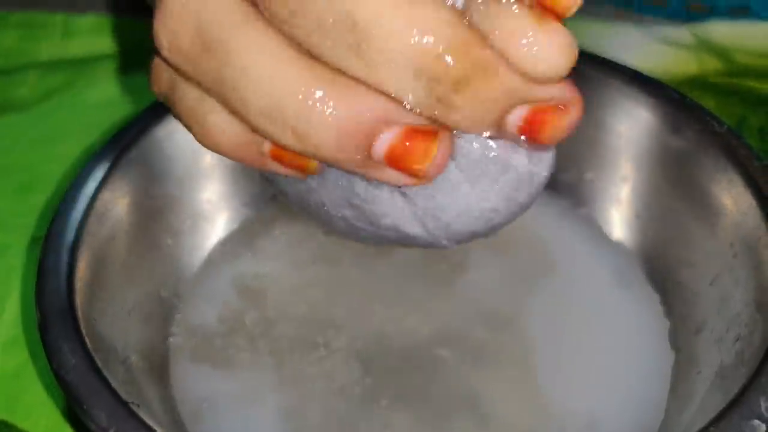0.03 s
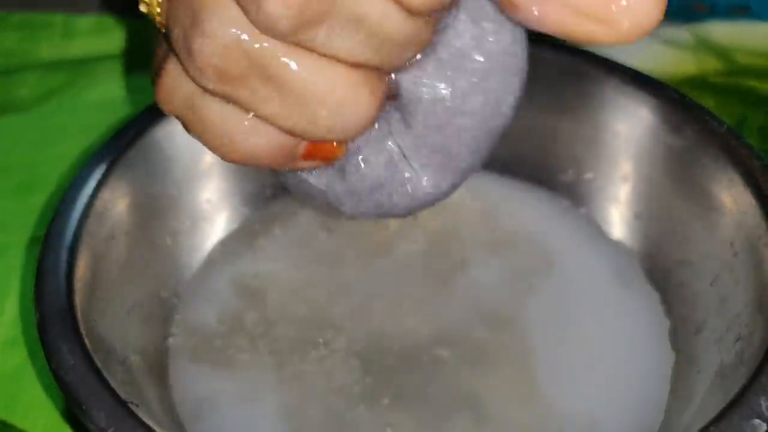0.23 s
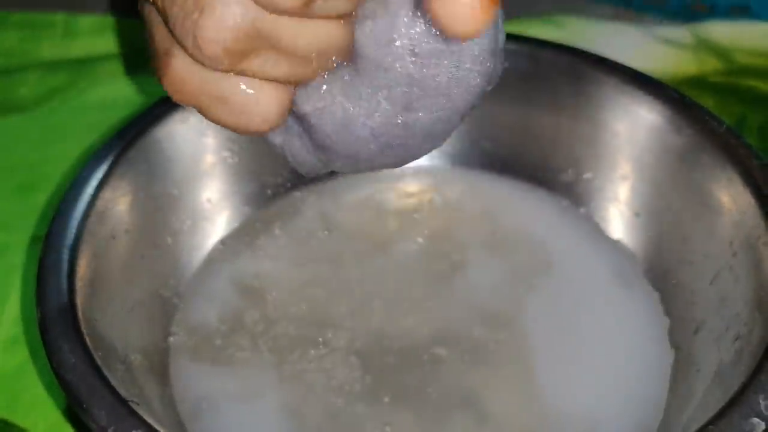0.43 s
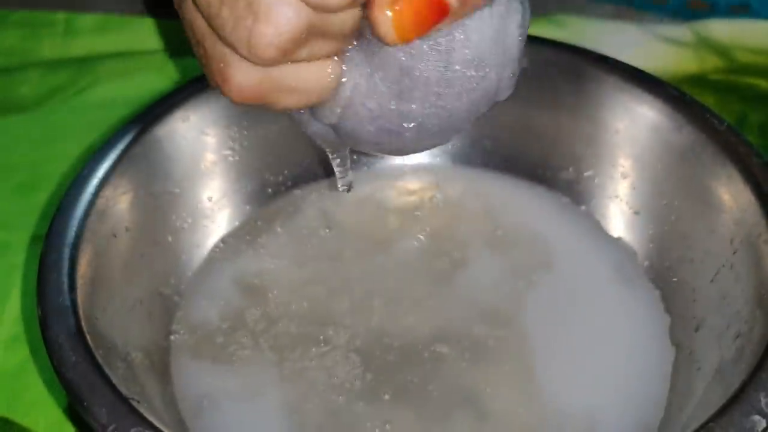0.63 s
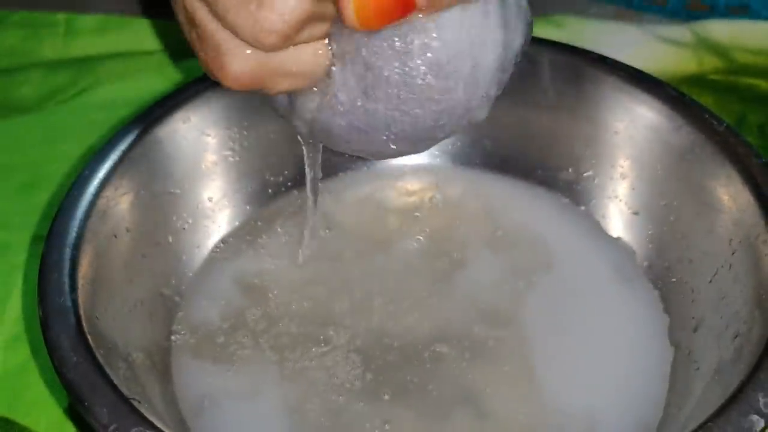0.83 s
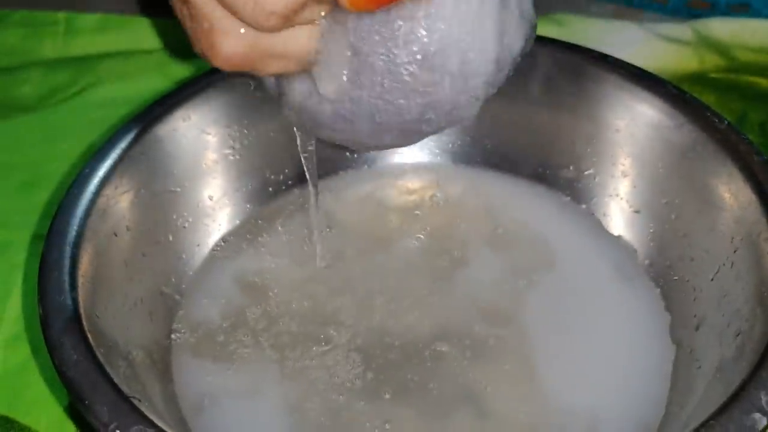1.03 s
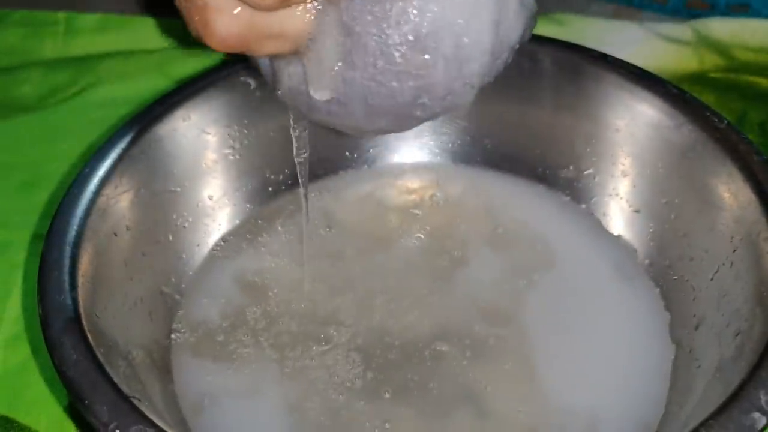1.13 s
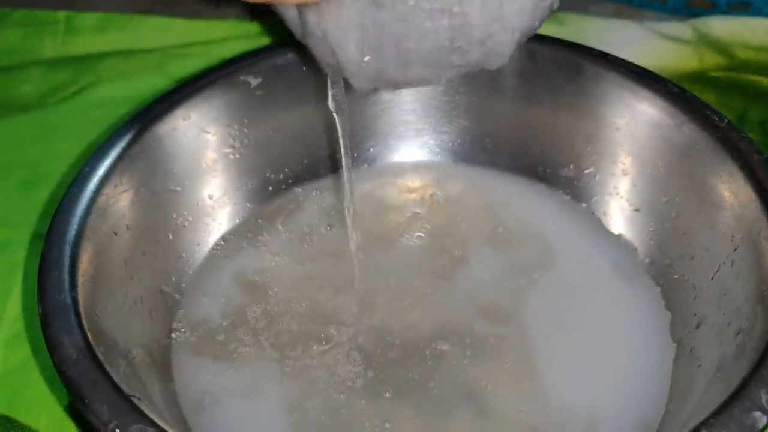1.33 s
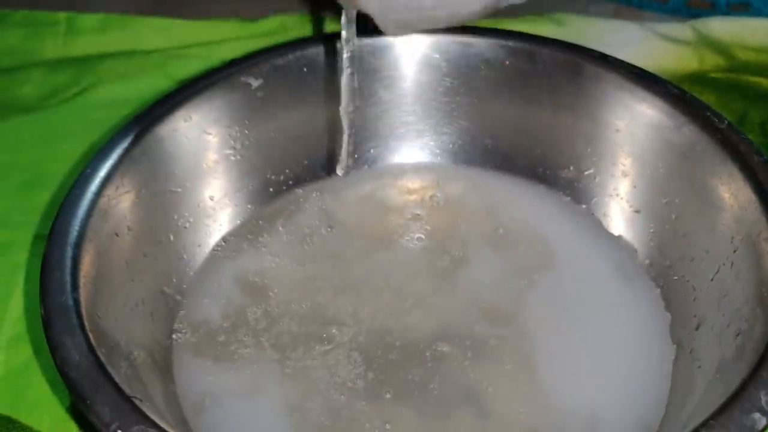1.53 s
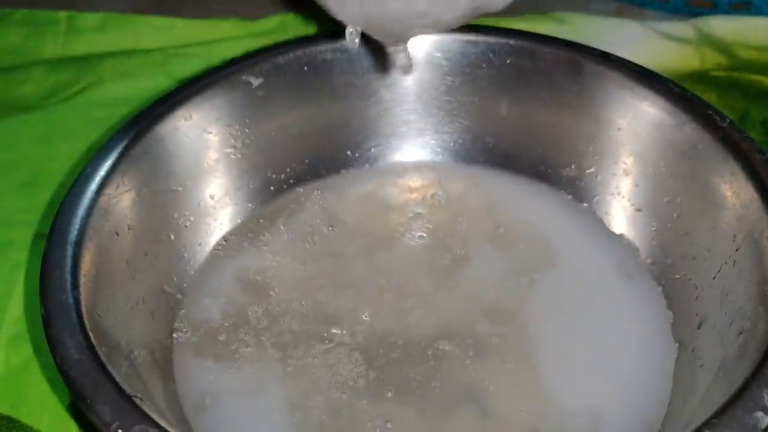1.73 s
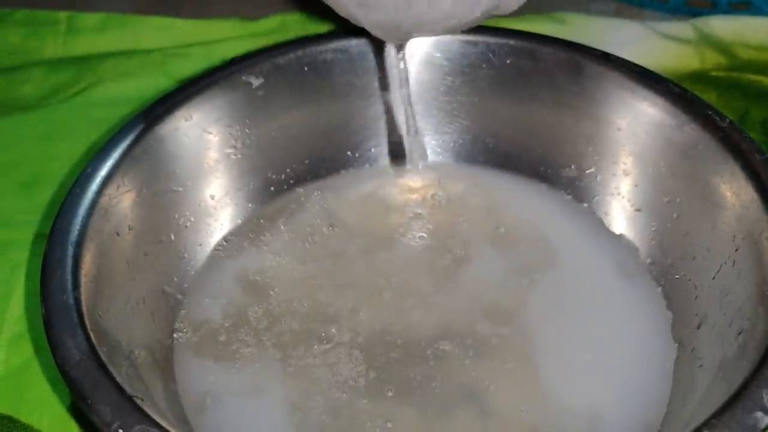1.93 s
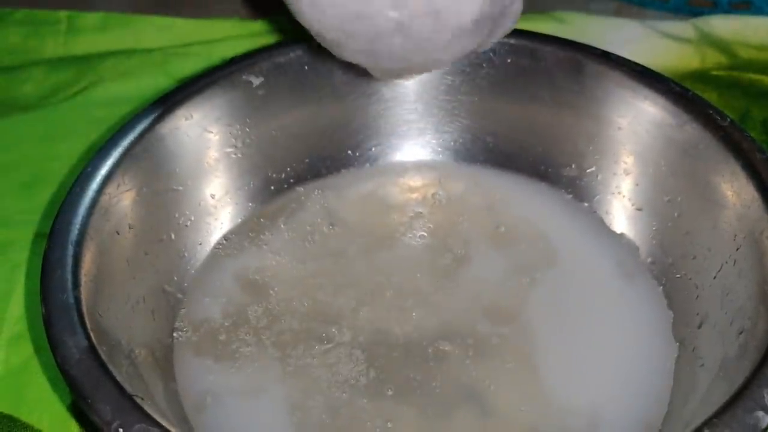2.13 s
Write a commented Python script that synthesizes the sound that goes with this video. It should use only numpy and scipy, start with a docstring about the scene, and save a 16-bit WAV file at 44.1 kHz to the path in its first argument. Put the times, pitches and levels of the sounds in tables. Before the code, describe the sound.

Wet cloth bundle squeezed by hand, crackling and fizzing with tiny bubble pops over a fan drone

```python
"""A room where a fan drones: a wet cloth bundle is wrung by hand over a steel bowl.
Fan and room hiss are shaped noise, the fan with a sine blade tone; dense tiny pops make the seeping fizz.
Trapped air crackles out of the weave in short bright bursts of clicks, with dying bubble tones, sharp
droplet snaps, soft low squelches and one thin whistle of leaking air.
Two microphone ports, each with its own treble resonance, colour crackle bodies, droplets and fizz."""
import sys
import numpy as np
from scipy import signal
from scipy.fft import rfft, irfft
from scipy.io import wavfile

SR = 44100
rng = np.random.default_rng(int(sys.argv[2]) if len(sys.argv) > 2 else 0)


def materialize(psi):
    """Save the field psi as 16-bit PCM at rate SR to the path in sys.argv[1].

    A 1-D psi becomes a single channel; in a 2-D psi each row is a channel.
    """
    bounded = np.clip(np.atleast_2d(psi).T, -1, 1)
    quanta = np.round(bounded * 32767).astype(np.int16)
    wavfile.write(sys.argv[1], SR, quanta)


N = 96093

# Every lean is left minus right.
# Broad fan drone. Each row: frequency in Hz, relative density in dB per Hz.
FAN_SPECTRUM = [(20, -20), (43, -23.5), (87, -13.5), (107, -11.5), (150, -5.5), (170, 1), (186, -4),
                (200, -8), (222, -13.5), (260, -7.5), (329, -20), (536, -22.5), (728, -33), (1010, -34),
                (1500, -47)]
# Room hiss. Each row: frequency in Hz, relative density in dB per Hz.
AIR_SPECTRUM = [(590, -13), (1000, -13), (1420, -4.5), (1640, -4), (1740, 0), (2000, -0.5), (3920, -9),
                (4830, -14), (5420, -42), (6370, -33), (9020, -23), (15900, -13.5)]
# Stereo likeness of drone and hiss. Each row: frequency in Hz, left-right correlation from -1 to 1.
LIKENESS_BY_HZ = [(60, 0.92), (130, 0.97), (290, 0.88), (640, 0.62), (1410, 0.06), (3100, -0.07),
                  (6820, -0.01), (15000, 0.04)]
# Stereo lean of drone, hiss and blade tone. Each row: frequency in Hz, lean in dB.
LEAN_BY_HZ = [(60, 3.0), (110, 4.0), (200, 3.0), (380, 4.0), (700, 4.5), (1290, 4.5), (2380, 3.5),
              (4400, 4.0), (8120, 5.0), (15000, 0.0)]
# Fizz of seeping water. Each row: time in seconds, level before the band-pass in dB, lean in dB.
SEEP_COURSE = [(0.0, -56, 3.5), (0.35, -54, -2), (0.68, -58.5, 2.0), (1.63, -58.5, 2.5), (1.81, -60, 4.5),
               (2.04, -59.5, -4), (2.18, -55, 2)]
# Air leaking thinly after a pop. One row: start in seconds, fade time constant in seconds,
# level in dB, frequency in Hz, width of each resonance in Hz, lean in dB.
AIR_LEAK = (1.724, .1, -62.5, 4900, 260, 9.0)
# Soft low squelches of the wet weave. Each row: start in seconds, level before the band-pass in dB,
# length in seconds, low edge in Hz, high edge in Hz.
SQUELCH_EVENTS = [(0.164, -50, 0.01, 1000, 2400), (0.46, -44, 0.0082, 890, 2200),
                  (0.469, -46, 0.016, 1400, 2650), (.49, -45, 0.0062, 1000, 2700),
                  (0.652, -53, 0.027, 1200, 2900), (0.881, -54.5, 0.073, 1190, 3040),
                  (1.307, -50.5, 0.0093, 1300, 3340), (2.034, -44.5, 0.0058, 1280, 3030),
                  (2.069, -52, 0.068, 1000, 3320)]
# Single air bubbles ring as they burst. Each row: start in seconds, level before decay and attack in dB,
# starting frequency in Hz, lean in dB, 60 dB decay time in seconds, pitch rise in octaves per second.
BUBBLE_EVENTS = [(.167, -38.5, 5430, -6, 0.017, 3), (.169, -47, 1675, 13, 0.03, 6),
                 (0.4212, -54, 10500, -7, 0.032, 11), (.427, -47, 10900, -10, .02, 6),
                 (0.461, -46, 1700, 3, 0.017, 9.0), (.6495, -46, 1705, 6, 0.033, 4),
                 (.6535, -50.5, 3090, -4, 0.027, 0), (.6645, -48, 2220, -1, 0.02, 0),
                 (.671, -50, 3100, -5, 0.014, 8), (0.8625, -36, 6880, 8, .012, 0),
                 (1.0425, -33, 6200, 17.5, 0.014, 17), (.894, -42, 5400, 8, .015, -1),
                 (.925, -39, 531, 4, 0.1, 0), (1.0754, -34.5, 8840, -8, 0.0075, 6),
                 (1.135, -43, 5140, 13, 0.047, -3), (1.307, -45.5, 5100, 17.5, 0.061, 2.5),
                 (1.401, -34.5, 5200, 12.5, 0.013, 0), (1.400, -38, 6070, 14, .01, 0),
                 (1.463, -38, 4270, 10.5, 0.029, 3), (1.464, -40, 5420, 14, 0.025, -6),
                 (1.466, -45, 7300, 0, .012, 0), (1.546, -36.5, 5080, 19.5, 0.012, 4),
                 (1.546, -37, 6040, 14, 0.013, 2), (1.658, -35.5, 5200, 11, 0.0084, 0),
                 (1.713, -28.5, 4980, 16.5, 0.0097, -2), (1.712, -31, 7200, 8.5, 0.014, 3),
                 (1.712, -41.5, 4360, 10, 0.018, -5), (1.9983, -32, 8830, -22, 0.0054, 7),
                 (2.0205, -40, 7100, -10, 0.03, -2), (2.0424, -35, 4200, 12, .011, -3),
                 (2.0435, -42, 5100, 13, .01, 0), (2.043, -35, 3430, -1, 0.02, 0),
                 (1.308, -33.5, 6200, 13.5, 0.025, 3), (1.526, -37, 6170, 13, 0.0081, 0),
                 (1.5335, -32, 5880, 19.5, 0.007, -5), (1.462, -40, 6020, 12, 0.02, -1),
                 (2.0282, -38.5, 8700, -15, 0.0094, -2)]
# Droplets snap off the weave. Each row: start in seconds, peak before the ports in dB, lean in dB,
# low edge in Hz.
DROPLET_EVENTS = [(.9035, -39, 8, 5800), (.909, -42, 6, 5000), (1.047, -39, 8, 4500),
                  (1.0548, -39, 9, 3800), (1.0595, -40, 10, 4300), (2.0657, -30, -2, 5800),
                  (2.0682, -33, -2, 5800), (2.0707, -34, -2, 5800), (2.0757, -32, -3, 5800),
                  (2.0828, -33, -5, 5800), (2.0858, -33, -4, 5800), (2.112, -36, -3, 5800)]
# Air crackles out of the cloth. Each row: start in seconds, level before the band-pass in dB, lean in dB,
# hold in seconds, low edge in Hz, top-treble level relative to the body in dB before its band-pass.
CRACKLE_EVENTS = [(0.165, -42.5, 5, 0.0069, 3800, -22), (0.253, -47.5, -11, 0.0036, 5000, -29),
                  (0.42, -50, -1, 0.0085, 5040, -25), (0.461, -46, 1, 0.0027, 4500, -25),
                  (.491, -47, 5, 0.0025, 4500, -25), (0.586, -47, 2, 0.0056, 3530, -22),
                  (0.8615, -41, 7, 0.0049, 3820, -25), (0.888, -46.5, -6, .004, 5000, -28),
                  (0.893, -43.5, 9.5, 0.007, 3420, -24), (0.906, -48.5, 4, 0.025, 2980, -26),
                  (1.011, -49, -1, 0.0043, 2800, -25), (1.04, -44, -6, 0.0087, 4700, -15),
                  (1.046, -47, 12, 0.018, 3550, -28), (1.074, -47, 3, 0.0037, 4500, -11),
                  (1.092, -48, 12.5, 0.0051, 3220, -29), (1.134, -47, 4.5, 0.011, 3620, -27),
                  (1.304, -40.5, -5, 0.013, 3600, -27), (1.374, -52.5, -8, 0.029, 6000, -25),
                  (1.397, -45, 4, 0.0021, 4400, -27), (1.462, -41.5, 8, 0.0031, 3600, -33),
                  (1.527, -45, 13, 0.0018, 3500, -25), (1.532, -43.5, 9.5, 0.003, 3550, -28),
                  (1.544, -44, 3, 0.0044, 3700, -29), (1.656, -44, 2, 0.0041, 4460, -27),
                  (1.707, -47.5, 18, .001, 4970, -27), (1.989, -47, -6, 0.0039, 5500, -15),
                  (1.997, -39.5, -7, 0.0033, 5100, -9), (2.014, -48, 3, 0.0046, 5500, -22),
                  (2.019, -38.5, -1, 0.012, 4800, -26), (2.0383, -38, 2.5, 0.0075, 2810, -30),
                  (2.048, -49, 4, 0.033, 3600, -28), (2.0665, -42, 6, .006, 5900, -30),
                  (2.075, -43, 5, 0.0038, 5760, -30), (2.09, -40, -4, 0.004, 5800, -33),
                  (2.09, -42.5, 1, 0.0083, 3540, -30), (2.102, -44, -2, 0.0041, 3220, -30),
                  (2.107, -44.5, -7, 0.012, 5050, -32), (2.133, -45.5, -2, 0.006, 5500, -30)]
# Microphone ports, left then right. Each row: resonance in Hz, width in Hz, gain of the added
# resonance in dB, low-pass edge in Hz.
MIC_PORTS = [(6200, 1220, 6, 7300), (8700, 630, -11.5, 9250)]

FAN_DB, AIR_DB = -39.5, -65.5   # rms of the mid
BLADE_TONE_HZ, BLADE_TONE_DB = 181.35, -38.5   # rms before lean
SEEP_PER_S, SEEP_SPREAD_DB, SEEP_LOW_HZ = 9000, 3.0, 3920
SQUELCH_POPS_PER_S, SQUELCH_LEAN_DB = 1500, 3.0
FLUTTER_RMS, FLUTTER_HZ = .18, 550   # bubbles ring unevenly
BUBBLE_ATTACK_S = .0004
SPRAY_DB, SPRAY_S = -10, .0012   # spray trailing each snap: level re the click, time constant
POPS_PER_S, POP_SPREAD_DB = 4000, 3.5
OWN_POPS_GAIN = 1   # pops heard by one port only, relative to the shared ones
FIRST_POP = 4.5   # pop that opens a burst, in rms of one pop run
BURST_SAG_DB, RELEASE_S = 2, .0011   # weakening over the hold, then time constant of the fall
TAIL_DB, TAIL_S = -13.5, 0.043   # wet hiss after each burst: level re the burst, time constant
CRACKLE_TOP_HZ, TREBLE_LOW_HZ, CUTOFF_HZ = 10500, 9900, 15850


def from_db(db):
    """Gain of a level."""
    return 10 ** (np.asarray(db) / 20)


def rms_one(x):
    """Scaled to rms 1."""
    return x / np.sqrt(np.mean(x ** 2) + 1e-20)


def at_hz(points, hz):
    """Table read on a log-frequency axis."""
    table_hz, values = np.array(points).T
    return np.interp(np.log(hz), np.log(table_hz), values)


def pan(x, lean_db):
    """Mono or stereo sound leaned left by lean_db, half on each side."""
    return x * from_db(np.array([lean_db / 2, -lean_db / 2])).reshape(2, -1)


def low_pass(x, order, hz):
    """Butterworth low-pass."""
    return signal.sosfilt(signal.butter(order, hz, fs=SR, output="sos"), x)


def band(x, low_hz, high_hz):
    """Steep band-pass."""
    return signal.sosfilt(signal.butter(4, [low_hz, high_hz], "band", fs=SR, output="sos"), x)


def resonance(x, hz, width_hz):
    """Two-pole resonance, gain about 1 on top."""
    r = np.exp(-np.pi * abs(width_hz) / SR)
    zeros = (1 - r * r) / 2 * np.array([1, 0, -1])
    poles = [1, -2 * r * np.cos(2 * np.pi * hz / SR), r * r]
    return signal.lfilter(zeros, poles, x)


def pops(shape, per_s, spread_db):
    """Random clicks of uneven size and either sign; rms 1."""
    size = from_db(spread_db * np.minimum(rng.exponential(1, shape), 4))
    sign = rng.choice([-1, 1], shape)
    return rms_one(size * sign * (rng.random(shape) < per_s / SR))


def coloured(spectrum):
    """Stereo noise with a spectrum, a lean and a likeness; mid rms 1."""
    hz = np.maximum(np.arange(N // 2 + 1) * SR / N, 1)
    mid, side = rfft(rng.standard_normal((2, N)))
    alike = np.clip(at_hz(LIKENESS_BY_HZ, hz), -1, 1)
    both = np.sqrt(1 + alike) * mid + np.sqrt(1 - alike) * side * [[1], [-1]]
    outside = (hz < spectrum[0][0]) | (hz > spectrum[-1][0])
    gain = from_db(at_hz(spectrum, hz) + np.where(outside, -60, 0))
    out = irfft(pan(both, at_hz(LEAN_BY_HZ, hz)) * gain, N)
    return out / np.sqrt(np.mean(out.mean(axis=0) ** 2))


def room_hiss():
    """Steady noise shaped by the hiss spectrum."""
    return from_db(AIR_DB) * coloured(AIR_SPECTRUM)


def fan():
    """Broad noise drone plus the blade tone, a steady sine."""
    tone = np.sqrt(2) * np.sin(2 * np.pi * BLADE_TONE_HZ * np.arange(N) / SR)
    blade = pan(from_db(BLADE_TONE_DB) * tone, at_hz(LEAN_BY_HZ, BLADE_TONE_HZ))
    return from_db(FAN_DB) * coloured(FAN_SPECTRUM) + blade


def seep():
    """Dense tiny bubbles bursting on the wet cloth: band-passed pops at a drifting level and lean."""
    s, *columns = np.transpose(SEEP_COURSE)
    db, lean_db = [np.interp(np.arange(N) / SR, s, c) for c in columns]
    fizz = band(pops((2, N), SEEP_PER_S, SEEP_SPREAD_DB), SEEP_LOW_HZ, CRACKLE_TOP_HZ)
    return pan(from_db(db) * fizz, lean_db)


def whistle():
    """Leaking air: noise through two equal resonances, starting at once and fading out."""
    s, fade_s, db, hz, width_hz, lean_db = AIR_LEAK
    t = np.arange(N) / SR - s
    noise = rng.standard_normal((2, N))
    thin = rms_one(resonance(resonance(noise, hz, width_hz), hz, width_hz))
    return pan(from_db(db) * thin * (t > 0) * np.exp(-np.abs(t) / fade_s), lean_db)


def squelches():
    """Swelling and fading clusters of dull pops and noise."""
    out = np.zeros((2, N))
    grit = pops(N, SQUELCH_POPS_PER_S, POP_SPREAD_DB) + rng.standard_normal((2, N))
    for s, db, length_s, low_hz, high_hz in SQUELCH_EVENTS:
        at = slice(int(s * SR), int((s + .1) * SR))
        t = np.arange(grit[:, at].shape[1]) / SR
        swell = np.sqrt(np.sin(np.pi * np.clip(t / length_s, 0, 1)) + 1e-9)
        out[:, at] += from_db(db) * band(grit[:, at] * swell, low_hz, high_hz)
    return pan(out, SQUELCH_LEAN_DB)


def bubbles():
    """Short dying sines, some gliding in pitch, with a random level flutter."""
    out, t = np.zeros((2, N + SR)), np.arange(SR // 10) / SR
    wobble = low_pass(rng.standard_normal((2, N)), 2, FLUTTER_HZ)
    flutter = 1 + FLUTTER_RMS * rms_one(wobble)
    attack = 1 - np.exp(-t / BUBBLE_ATTACK_S)
    start_turns = rng.random((len(BUBBLE_EVENTS), 2))   # random phase per side
    for (s, db, hz, lean_db, t60_s, rise), turn in zip(BUBBLE_EVENTS, start_turns):
        gliding_hz = hz * 2 ** np.minimum(rise * t, .5)   # rises half an octave at most
        phase = 2 * np.pi * (np.cumsum(gliding_hz) / SR + turn[:, None])
        ring = from_db(db - 60 * t / t60_s) * attack * np.sin(phase)
        start = int(s * SR)
        out[:, start:start + len(t)] += pan(ring, lean_db)
    return out[:, :N] * flutter


def droplets():
    """One sharp click each with a short noise spray, thin below its low edge."""
    out, t = np.zeros((2, N)), np.arange(SR // 100) / SR
    noise = rng.standard_normal((len(DROPLET_EVENTS), 2, len(t)))
    sprays = from_db(SPRAY_DB) * noise * np.exp(-t / SPRAY_S)
    for (s, db, lean_db, low_hz), spray in zip(DROPLET_EVENTS, sprays):
        snap = band((t == 0) + spray, low_hz, CRACKLE_TOP_HZ)
        snap = band(snap, low_hz, CRACKLE_TOP_HZ)
        snap = snap / np.abs(snap).max(axis=1, keepdims=True)
        start = int(s * SR)
        out[:, start:start + len(t)] += pan(from_db(db) * snap, lean_db)
    return out


def crackles():
    """Runs of pops that hold, die fast and leave a hiss; returns the body and the top treble."""
    body, treble = np.zeros((2, 2, N + SR))
    t = np.arange(SR // 8) / SR
    shared = pops(N + SR, POPS_PER_S, POP_SPREAD_DB)
    own = pops((2, N + SR), POPS_PER_S, POP_SPREAD_DB)
    clicks = shared + OWN_POPS_GAIN * own
    hiss = rng.standard_normal((2, N + SR))
    for s, db, lean_db, hold_s, low_hz, treble_db in CRACKLE_EVENTS:
        at = slice(int(s * SR), int(s * SR) + len(t))
        sag = from_db(-BURST_SAG_DB * np.minimum(t / hold_s, 1))
        shape = np.exp(-np.maximum(t - hold_s, 0) / RELEASE_S) * sag
        burst = (clicks[:, at] + FIRST_POP * (t == 0)) * shape
        # same energy however the random pops fall
        energy = np.sum(burst ** 2 + 1e-12, axis=1, keepdims=True)
        burst = burst * np.sqrt(np.sum(shape ** 2) / energy)
        wet = burst + from_db(TAIL_DB) * hiss[:, at] * np.exp(-t / TAIL_S)
        body[:, at] += pan(from_db(db) * band(wet, low_hz, CRACKLE_TOP_HZ), lean_db)
        top = band(burst, TREBLE_LOW_HZ, CUTOFF_HZ)
        treble[:, at] += pan(from_db(db + treble_db) * top, lean_db)
    return body[:, :N], treble[:, :N]


def ports(x):
    """Each microphone port adds its own resonance to its side, then falls off steeply above its edge."""
    sides = []
    for side, (hz, width_hz, gain_db, top_hz) in zip(x, MIC_PORTS):
        lifted = side + from_db(gain_db) * resonance(side, hz, width_hz)
        sides.append(low_pass(lifted, 9, top_hz))
    return np.array(sides)


def scene():
    """Fan and room hiss around, cloth in front."""
    background = room_hiss() + fan()
    soft = whistle() + squelches() + bubbles()
    body, treble = crackles()
    return background + soft + ports(seep() + droplets() + body) + treble


def record(dry):
    """Steep low-pass just above CUTOFF_HZ."""
    top_cut = signal.cheby2(14, 70, CUTOFF_HZ + 250, fs=SR, output="sos")
    return signal.sosfilt(top_cut, dry)


dry = scene()
out = record(dry)
materialize(out)
```